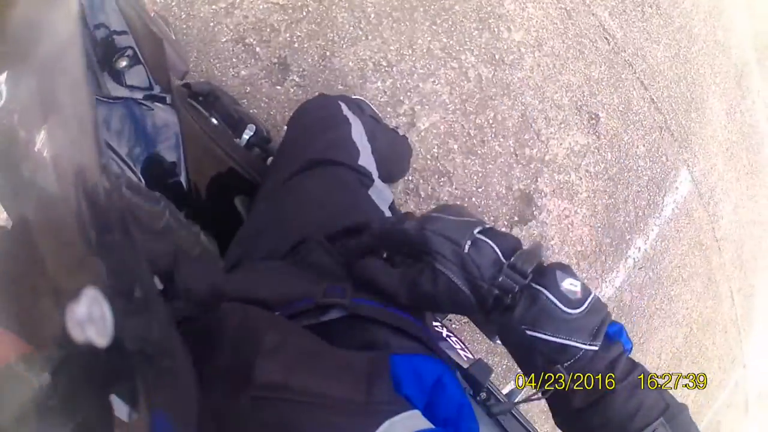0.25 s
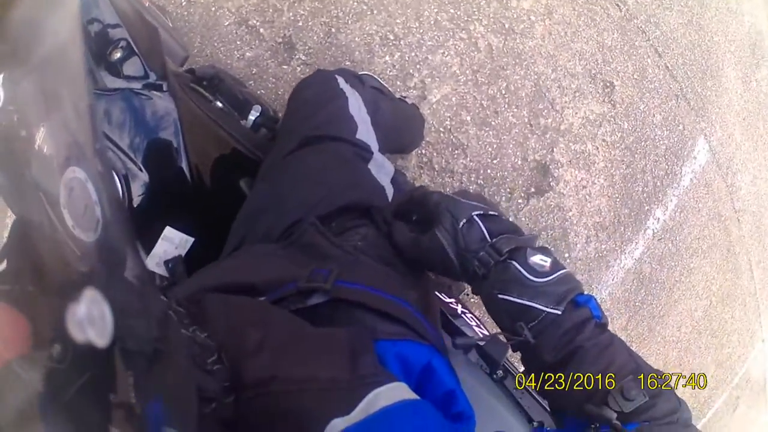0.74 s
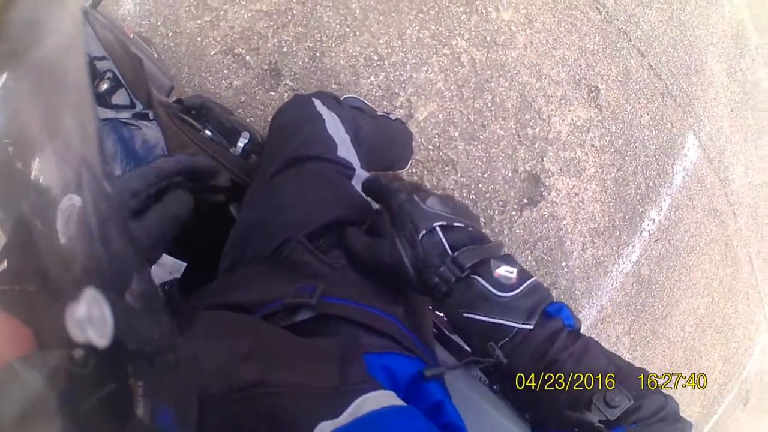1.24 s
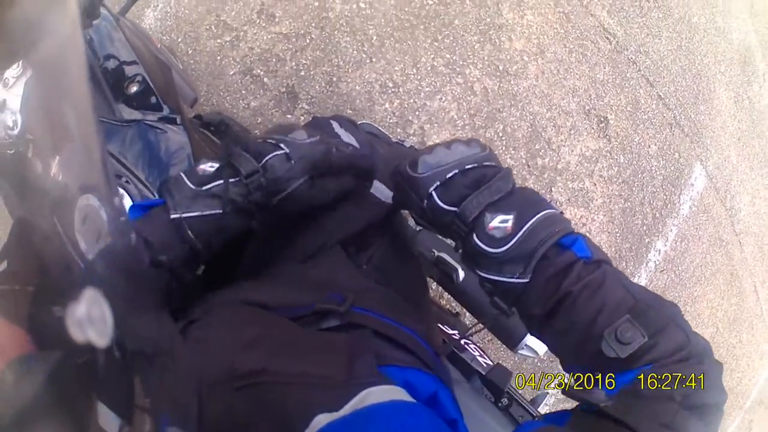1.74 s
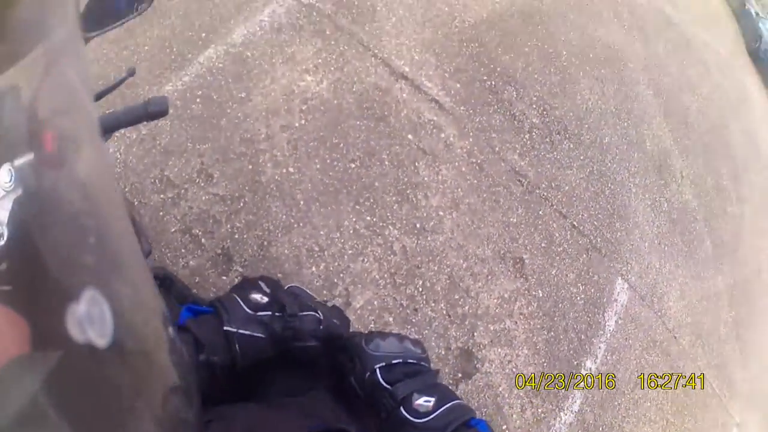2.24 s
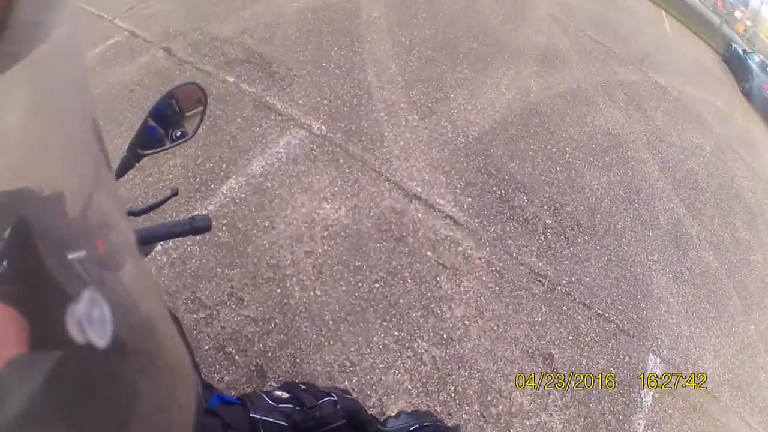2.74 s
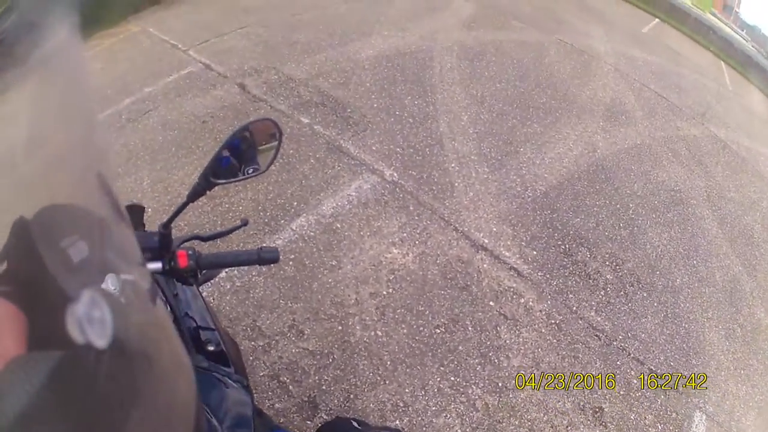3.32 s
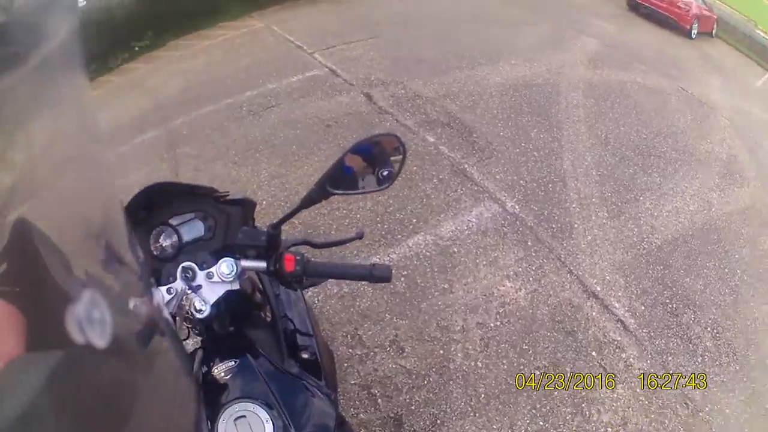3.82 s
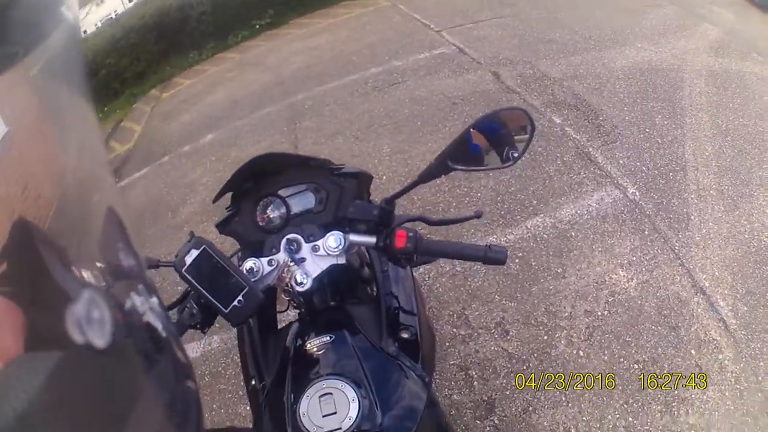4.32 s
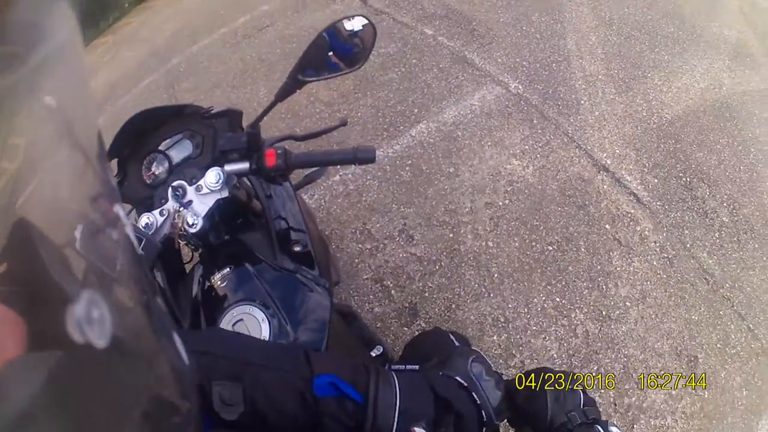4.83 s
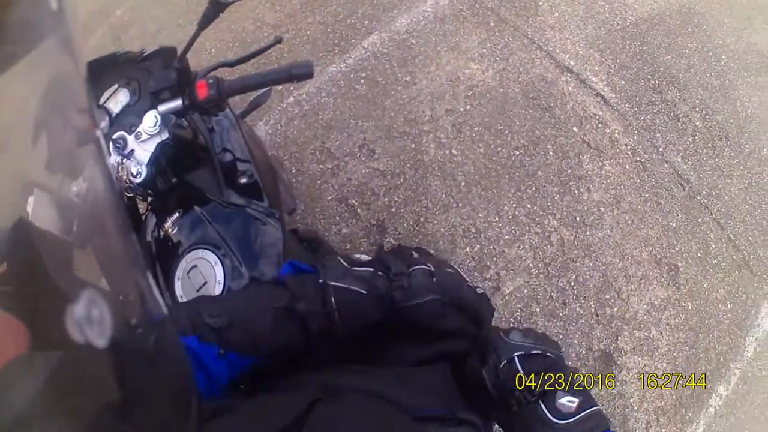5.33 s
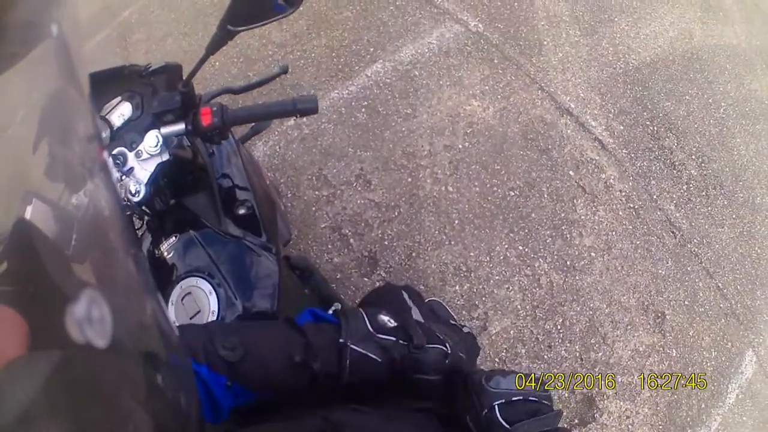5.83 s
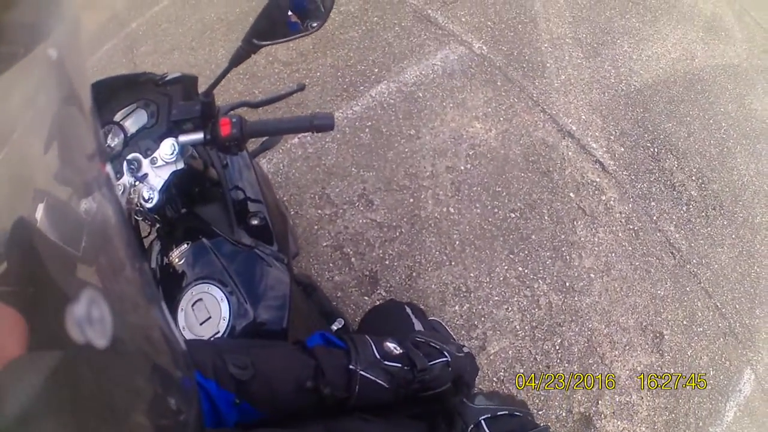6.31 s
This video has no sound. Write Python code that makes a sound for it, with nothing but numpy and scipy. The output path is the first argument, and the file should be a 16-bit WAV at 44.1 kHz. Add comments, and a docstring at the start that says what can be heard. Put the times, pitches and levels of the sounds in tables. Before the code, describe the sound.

A single-cylinder motorcycle idles with a slow, soft thudding beat while gloves and straps knock and rub a helmet shell, over faint electronic hiss.

```python
"""From the start a single-cylinder motorcycle idles in a car park, heard by a small camera on the
rider's helmet, over a deep breeze rumble, distant traffic and thin whines from the camera's circuits.
Gloves, collar and straps knock and rub the shell hardest in the first 0.6 s, and knocks gather again
near 5.3 s. The circuits' treble hiss comes on near 0.1, 2.1, 4.1 and 6.1 s, with short blips on a clock
between. A dry tick of a buckle or zip falls at 2.6 s, five more after 6 s: short filtered noise bursts."""
import sys
import numpy as np
from scipy import signal
from scipy.fft import rfft, irfft
from scipy.io import wavfile
from scipy.ndimage import uniform_filter1d

SR = 44100
rng = np.random.default_rng(int(sys.argv[2]) if len(sys.argv) > 2 else 0)


def persist_wave(psi):
    """Save psi, clipped to +-1, as 16-bit WAV."""
    counts = np.round(np.clip(psi, -1, 1) * 32767).astype(np.int16)
    wavfile.write(sys.argv[1], SR, np.atleast_2d(counts).T)


N = 289508
T = np.arange(N) / SR  # time axis [s]

# Engine firing rate: t/s, f/Hz [firings per second]
FIRING_RATE = [(0.0, 13.073), (0.6, 13.491), (0.76, 12.721), (1.24, 13.443), (1.4, 12.994), (2.2, 13.782),
               (2.84, 12.953), (3.0, 13.746), (3.16, 12.731), (3.48, 13.077), (3.8, 12.379), (3.96, 11.86),
               (4.28, 13.008), (4.62, 13.541), (4.75, 12.32), (5.23, 13.764), (5.39, 13.107),
               (6.57, 13.432)]
FIRST_PHASE = .498  # fraction of a firing cycle already run at t = 0
# Exhaust pipe modes, before the puff softens them: f/Hz, level/dB, t60/s
PIPE_MODES = [(59.6, -34, .088), (73.7, -29.1, .059), (208, -22.1, .027), (295, -22.3, .11)]
PUFF_S, ECHO_S, ECHO_GAIN = .0016, .0166, .5  # Gaussian sigma of a puff; pipe round trip; amplitude returned
# Valve gear modes, relative levels: f/Hz, level/dB, t60/s
VALVE_MODES = [(1995, 0, 0.02), (3100, 1.5, 0.017), (4160, -1.5, 0.016), (5180, -5.5, 0.022)]

# Helmet shell modes from lowest to highest group, relative levels: f/Hz, level/dB, t60/s
DEEP_MODES = [(99, -13, 0.11), (114.5, -0.5, 0.028), (157.4, 4, 0.031), (207, -6, 0.026),
              (347.5, -17.5, 0.075)]
BODY_MODES = [(293, 6.5, 0.022), (493, 1, 0.026), (666, -4.5, 0.038), (890, -10, 0.077)]
HIGH_MODES = [(1189, -4.5, 0.029), (1337, -1.5, 0.029), (1515, 7.5, 0.015), (1713, 3, 0.024),
              (1944, 0.5, 0.019)]
TOP_MODES = [(2600, 0.5, 0.0081), (3100, 2.5, 0.0086), (3774, 7.5, 0.014), (4320, 1, 0.012),
             (5000, -4.5, 0.012)]
# Knocks on the shell: t/s, direction [+1 or -1], then level/dB of thud [peak], body, click and crack
# [the last three before a rough contact is added]
KNOCKS = [(0.0259, 1, -31.5, -32, -42, -51.5), (0.232, -1, -24, -52, -38, -53),
          (0.2467, 1, -10.5, -18, -21.5, -39), (0.255, -1, -6, -38, -40, -43),
          (0.261, -1, -13.5, -22, -16, -23), (0.3337, 1, -31.5, -48, -25, -38),
          (0.4679, -1, -23, -37, -40, -41), (0.4896, -1, -34, -48, -55, -42),
          (0.5036, -1, -19.5, -56, -40, -55), (0.518, 1, -37, -36, -44, -48),
          (0.5381, 1, -21, -48, -45, -43), (0.5456, -1, -26.5, -36, -36, -59),
          (0.554, 1, -28, -48, -50, -57), (0.573, 1, -42, -60, -38, -58),
          (0.714, -1, -31.5, -54, -33.5, -42), (0.8229, 1, -38, -36, -40.5, -54),
          (1.3296, -1, -46, -63, -55, -56), (1.503, 1, -52, -58, -40, -51), (1.976, 1, -31, -50, -49, -61),
          (2.022, -1, -60, -63, -44.5, -63), (2.0529, -1, -39.5, -44, -69, -64),
          (2.6156, -1, -35, -51, -45.5, -63), (2.6384, 1, -39, -54, -46, -65),
          (3.1585, -1, -29, -43.5, -48, -65), (3.842, -1, -29.5, -32.5, -36, -55),
          (4.5382, -1, -37.5, -59, -51, -55), (5.079, -1, -57, -59, -38, -65),
          (5.281, -1, -42, -44, -52, -62), (5.3196, 1, -37, -38, -28.5, -58),
          (5.3495, 1, -27, -44, -31, -54), (5.362, -1, -40, -58, -46, -63), (5.383, 1, -35, -35, -37, -64),
          (5.392, -1, -39.5, -56, -47, -60), (5.5593, 1, -49, -47, -37.5, -62),
          (5.5801, -1, -40, -42, -35.5, -64)]
# Strokes of cloth over the shell: start t/s, length t/s, level/dB of deep, high and top rub [rms]
STROKES = [(0.0, .1, -49.5, -50.5, -66), (.275, .03, -30.5, -50.5, -67), (.34, 0.06, -37, -43.5, -63),
           (0.484, 0.034, -29.5, -43, -53), (0.529, 0.035, -32.5, -50, -60.5), (.58, 0.05, -46, -53, -66),
           (.69, 0.038, -44, -53, -64), (.76, 0.098, -45.5, -56.5, -67.5), (.885, 0.15, -46, -48, -64.5),
           (1.3, 0.13, -53, -52.5, -68.5), (1.51, 0.089, -52, -50.5, -67), (1.64, 0.2, -50.5, -52.5, -68.5),
           (1.89, 0.177, -52.5, -59, -75), (2.11, .1, -54, -51, -69), (2.57, 0.067, -49.5, -67, -86),
           (3.1, 0.092, -58, -65, -83), (3.46, .2, -62.5, -65.5, -87), (3.799, .17, -49, -61.5, -69),
           (4.3, 0.263, -56.5, -63.5, -69.5), (5.074, 0.015, -48, -52, -70),
           (5.145, 0.032, -48.5, -58, -64), (5.23, 0.05, -46.5, -50.5, -68), (5.31, 0.077, -41, -51.5, -74),
           (5.565, 0.053, -46.5, -55.5, -73), (5.63, .06, -62, -59.5, -72), (5.85, 0.083, -54, -68, -80),
           (6.53, .04, -70, -61, -80)]
# Cloth resting on the shell: level/dB of deep, high and top rub [rms]
REST_DB = (-62, -70, -76.5)
PRESS_S, LIFT_S = .017, .014  # e-folding times of a stroke's rise and decay
# Dry ticks of a buckle or zip: t/s, level/dB [peak], centre f/Hz, t60/s
TICKS = [(2.5707, -34.5, 3100, 0.018), (6.038, -44.5, 2440, 0.087), (6.048, -49.5, 3780, 0.069),
         (6.06, -44, 3240, 0.07), (6.13, -47.5, 2600, 0.024), (6.221, -48, 3230, 0.017)]

# Breeze and sway of the head: t/s, level/dB [rms]
RUMBLE_LEVEL = [(0.0, -45), (.23, -53), (.29, -29), (.33, -28), (.37, -50), (.44, -46), (.5, -32),
                (.58, -29), (.7, -39), (.77, -54), (.9, -47), (1.3, -43.5), (1.55, -56.5), (2.08, -41.5),
                (2.3, -57), (2.65, -45), (2.88, -45), (2.97, -56), (4.3, -57), (4.85, -47), (5.1, -53),
                (5.39, -44), (5.5, -49), (6.02, -52.5), (6.11, -46), (6.32, -57), (6.56, -46.5)]

# Spans in which the camera's hiss is on: from t/s, to t/s
BUSY_SPANS = [(.102, .353), (.382, .459), (.502, .788), (.823, 1.09), (2.103, 2.293), (2.322, 2.459),
              (2.51, 2.622), (2.662, 3.009), (3.042, 3.111), (4.122, 4.458), (4.518, 4.694), (4.734, 5.013),
              (5.047, 5.107), (6.101, 6.13), (6.159, 6.463), (6.497, 6.57)]
# Spans in which it only blips on a clock: first blip t/s, end t/s
IDLE_SPANS = [(.007, .09), (1.1036, 2.09), (3.1282, 4.11), (5.1163, 6.09)]
BLIPS_PER_S = 53.8  # clock rate; some beats stay silent
# Humps of the hiss spectrum, relative levels: centre f/Hz, full width f/Hz, level/dB
HISS_HUMPS = [(6270, 680, -10.5), (8100, 1600, -14.5), (10690, 1460, -6), (12700, 730, -5),
              (13900, 340, -10.5), (13800, 600, -2.5), (15200, 620, -3.5)]
HISS_DB = -56  # rms while fully on
# Whine that never stops: f/Hz, level/dB [rms]
STEADY_WHINE = [(14050, -78), (14104, -72), (14158, -82)]
# Whine that sounds with the hiss: f/Hz, level/dB [rms while fully on]
BUSY_WHINE = [(13384, -69), (13466, -66.5)]

# Spectrum of the background noise: f/Hz, level/dB [relative density]
FLOOR_SPECTRUM = [(150, -7.5), (250, -3), (459, -15), (720, -13), (1150, -12.5), (1250, -11.5), (1490, -10),
                  (2510, -19), (3030, -17), (3490, -24), (3870, -20.5), (7350, -23.5), (11900, -21.5),
                  (13700, -20.5), (15800, -25.5)]
FLOOR_DB = -57.5  # rms of the whole background noise
EDGE_HZ = 15790  # low-pass cutoff of the recorder


def gain_of(db):
    """Level in decibels as an amplitude ratio."""
    return 10 ** (np.asarray(db) / 20)


def evened(x):
    """Normalisation to unit rms."""
    return x / np.sqrt(np.mean(x ** 2) + 1e-20)


def ring(modes):
    """Modal superposition: an impulse excites decaying sines, neighbours in opposite phase."""
    t = T[:SR // 5]
    response = np.zeros(len(t))
    for k, (hz, db, t60) in enumerate(modes):
        decay = gain_of(db - 60 * t / t60)
        response += (-1) ** k * decay * np.sin(2 * np.pi * hz * t)
    return response


def blows(times, gains, response):
    """Linear superposition: an impulse train convolved with one impulse response."""
    train = np.zeros(N)
    samples = np.round(np.asarray(times) * SR).astype(int)
    np.add.at(train, np.clip(samples, 0, N - 1), gains)
    return signal.oaconvolve(train, response)[:N]


def coloured(gain):
    """Spectral shaping: white noise weighted by gain(f/Hz), then brought to unit rms."""
    spectrum = rfft(rng.standard_normal(N))
    return evened(irfft(spectrum * gain(np.fft.rfftfreq(N, 1 / SR)), N))


def engine():
    """Pulsed excitation of a resonant pipe: each firing's puff rings the exhaust and is reflected once."""
    turns = FIRST_PHASE + np.cumsum(np.interp(T, *np.transpose(FIRING_RATE))) / SR
    fired = T[1:][np.diff(np.floor(turns)) > 0]
    direct_db, echo_db = rng.standard_normal((2, len(fired))) * [[1.1], [1.6]]  # uneven firings

    half = 300  # samples on each side of the puff's centre
    puff = np.exp(-.5 * (np.arange(-half, half + 1) / SR / PUFF_S) ** 2)
    pipe = np.convolve(ring(PIPE_MODES), puff / puff.sum())
    starts = fired - half / SR
    direct = blows(starts, gain_of(direct_db), pipe)
    echo = blows(starts + ECHO_S, ECHO_GAIN * gain_of(echo_db), pipe)

    # the rush of exhaust gas jumps up at each firing and decays over the cycle
    rush = coloured(lambda hz: 1 / (1 + (hz / 350) ** 2) * (hz > 50))
    chuff = np.exp(-(turns % 1) / .77) * rush
    # the valve gear rattles twice a cycle
    rattle = np.exp(-((2 * turns) % 1) / .4) * rng.standard_normal(N)
    valves = evened(signal.oaconvolve(rattle, ring(VALVE_MODES))[:N])
    return gain_of(.5) * (direct + echo) + gain_of(-56) * chuff + gain_of(-71.5) * valves


def knocks():
    """Impact excitation of shell modes: a rough contact of a few ms clicks first, then the shell thuds."""
    s, direction, thud_db, *upper_db = np.transpose(KNOCKS)
    thud = np.convolve(ring(DEEP_MODES), np.hanning(40))
    out = blows(s - 20 / SR, direction * gain_of(thud_db), thud / abs(thud).max())

    scuff = .067 * np.exp(-T[:700] / .0048)  # decay of the rough contact
    rough = rng.standard_normal(N)
    for db, modes in zip(upper_db, (BODY_MODES, HIGH_MODES, TOP_MODES)):
        click = blows(s - .0015, gain_of(db), [1.])
        contact = click + rough * blows(s - .002, gain_of(db), scuff)
        padded = np.convolve(ring(modes), np.hanning(9))  # gloves and padding dull the edge
        out += signal.oaconvolve(contact, padded / abs(padded).max())[:N]
    return out


def rubbing():
    """Stick-slip friction: cloth slips in random uneven grains that drive three groups of shell modes."""
    grains_per_s = np.array([[400], [2500], [4000]])  # deep, high, top
    grains = rng.standard_normal((3, N)) * (rng.random((3, N)) < grains_per_s / SR)
    grains *= gain_of(2 * np.minimum(rng.exponential(1, (3, N)), 3.5))  # some grains are larger

    power = gain_of(REST_DB)[:, None] ** 2 * np.ones(N)
    for start, length, *db in STROKES:
        rise = np.minimum(T - start, 0) / PRESS_S
        fall = np.maximum(T - start - length, 0) / LIFT_S
        power += np.outer(gain_of(db), np.exp(rise - fall)) ** 2

    out = np.zeros(N)
    for grain, modes, strength in zip(grains, (DEEP_MODES, HIGH_MODES, TOP_MODES), power):
        out += np.sqrt(strength) * evened(signal.oaconvolve(grain, ring(modes))[:N])
    return out


def ticks():
    """Band-limited transient: a sharp onset and decaying noise, filtered round each tick's own pitch."""
    out, t = np.zeros(N), T[:2000]
    for s, db, hz, t60 in TICKS:
        burst = gain_of(-60 * t / t60) * (rng.standard_normal(len(t)) + 4 * (t == 0))
        band = signal.butter(3, [hz / 1.42, hz * 1.37], "band", fs=SR, output="sos")
        tick = signal.sosfilt(band, burst)
        out[round(s * SR):][:len(t)] += gain_of(db) * tick / abs(tick).max()
    return out


def rumble():
    """Low-frequency pressure fluctuation: noise centred on 32 Hz follows the breeze and head sway."""
    level = gain_of(np.interp(T, *np.transpose(RUMBLE_LEVEL)))
    return level * coloured(lambda hz: 1 / (1 + ((hz - 32) / 12) ** 4))


def whine_of(lines):
    """Sum of pure tones, each at its rms level and a random phase."""
    out = np.zeros(N)
    for hz, db in lines:
        out += np.sqrt(2) * gain_of(db) * np.sin(2 * np.pi * (hz * T + rng.random()))
    return out


def hiss_gain(f):
    """Power addition of the resonance-like humps of the hiss."""
    return np.sqrt(sum(gain_of(2 * db) / (1 + (2 * (f - hz) / width) ** 4) for hz, width, db in HISS_HUMPS))


def circuits():
    """Electrical interference: activity gates humped hiss and whine over a steady whine."""
    on, blips = np.zeros((2, N))
    for start, end in BUSY_SPANS:
        on[round(start * SR):round(end * SR)] = 1
    for start, end in IDLE_SPANS:
        for s in np.arange(start, end, 1 / BLIPS_PER_S):
            chance, length = rng.random(2)
            half_s = .00056 + .0022 * length ** 3  # mostly short
            if chance < .75:
                blips[abs(T - s) < half_s] = 1
    on, blips = uniform_filter1d([on, blips], 40)  # softens the switching edges

    hiss = (on + gain_of(-1.5) * blips) * gain_of(HISS_DB) * coloured(hiss_gain)
    whine = (on + gain_of(8) * blips) * whine_of(BUSY_WHINE)  # blips favour whine over hiss
    band = gain_of(-69.5) * coloured(lambda f: 1 / (1 + ((f - 14100) / 60) ** 2))  # steady narrow noise
    return hiss + whine + whine_of(STEADY_WHINE) + band


def floor():
    """Stationary background noise: distant traffic and the microphone's own noise share one spectrum."""
    hz, db = np.transpose(FLOOR_SPECTRUM)
    return gain_of(FLOOR_DB) * coloured(lambda f: gain_of(np.interp(np.log(f + 1), np.log(hz), db)))


def scene():
    """Superposition of the pressures of all sources, and the circuit noise, in one channel."""
    mix = engine() + knocks() + rubbing() + ticks() + rumble() + circuits() + floor()
    return mix[None]


def record(dry):
    """Band limitation: a linear-phase low-pass filter sets the recorder's upper edge."""
    lowpass = signal.firwin(2047, EDGE_HZ, window=("kaiser", 9), fs=SR)
    return signal.oaconvolve(dry, lowpass[None], "same")


dry = scene()
out = record(dry)
persist_wave(out)
```